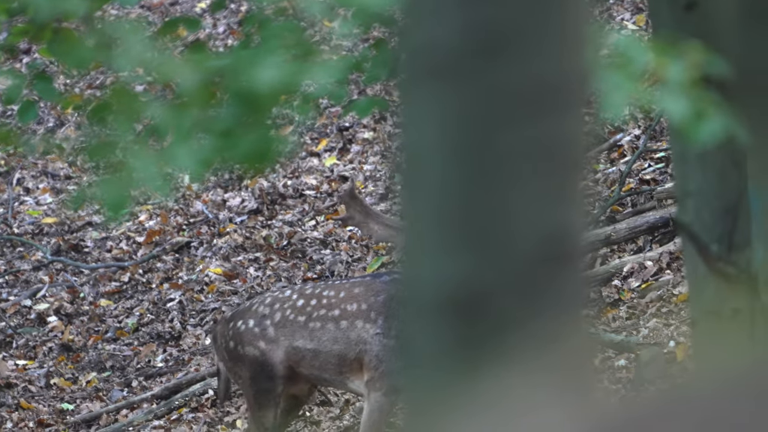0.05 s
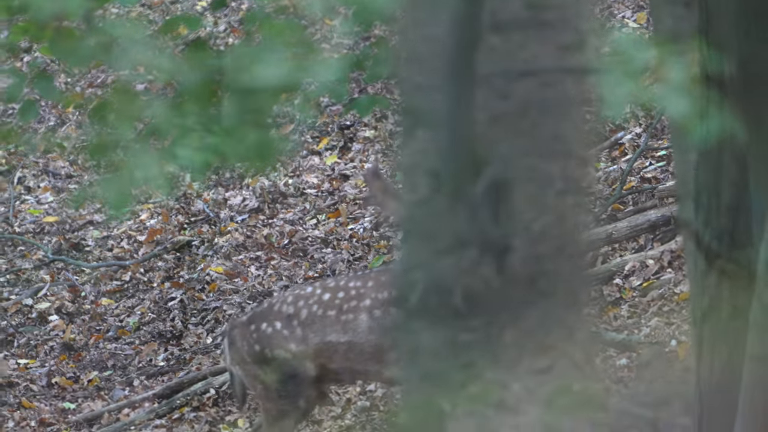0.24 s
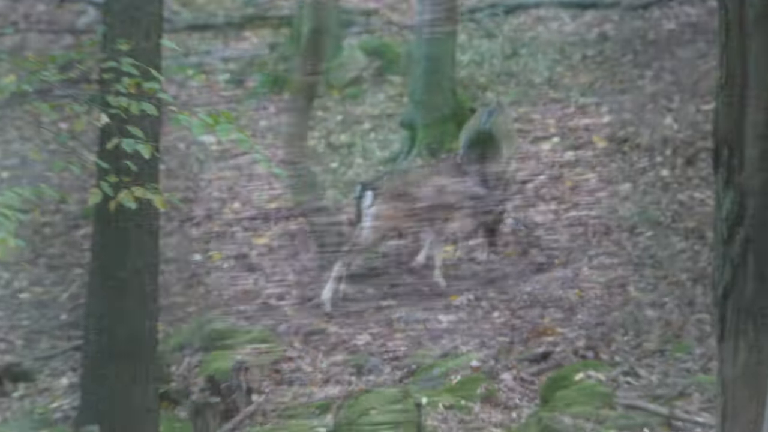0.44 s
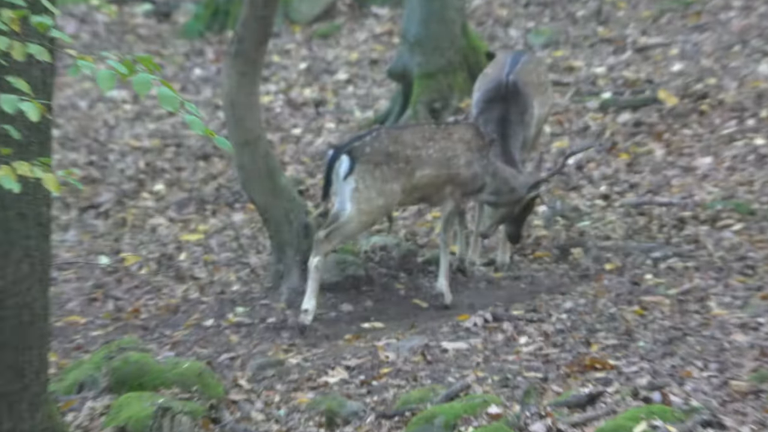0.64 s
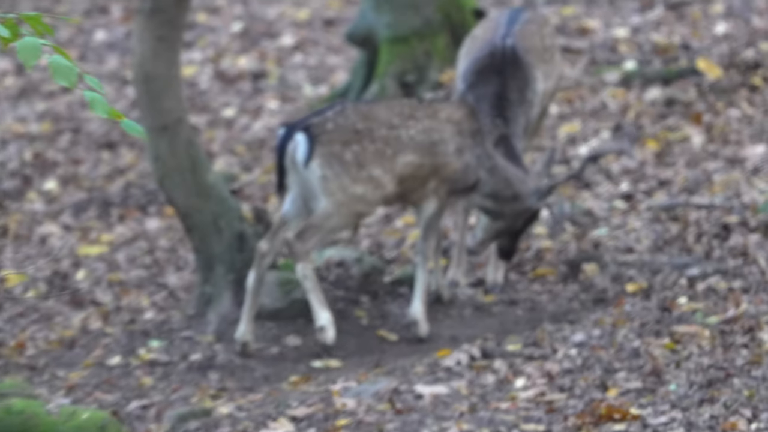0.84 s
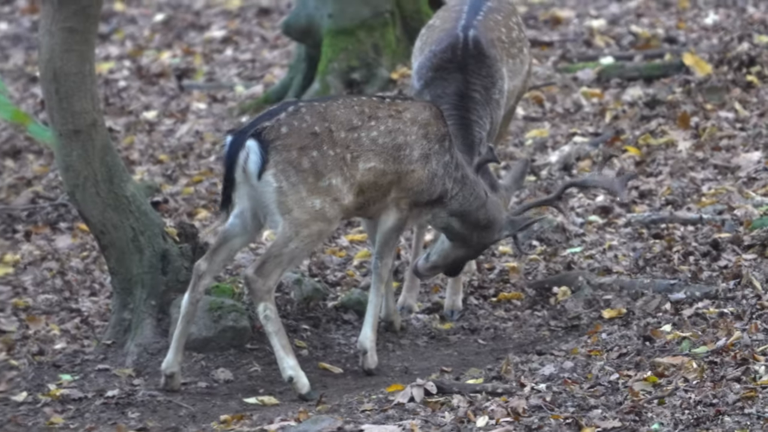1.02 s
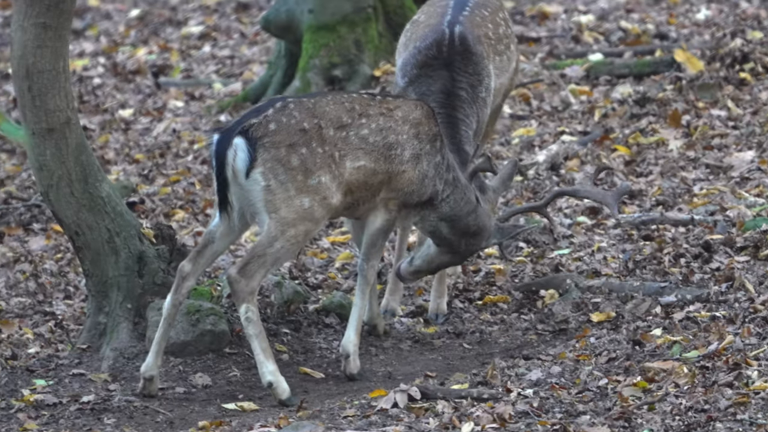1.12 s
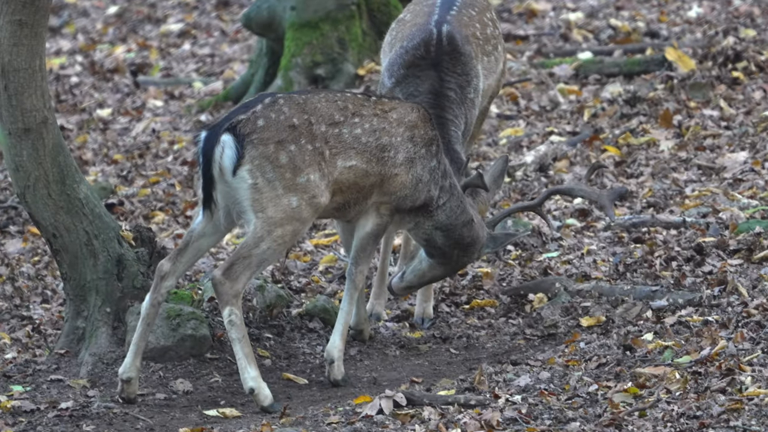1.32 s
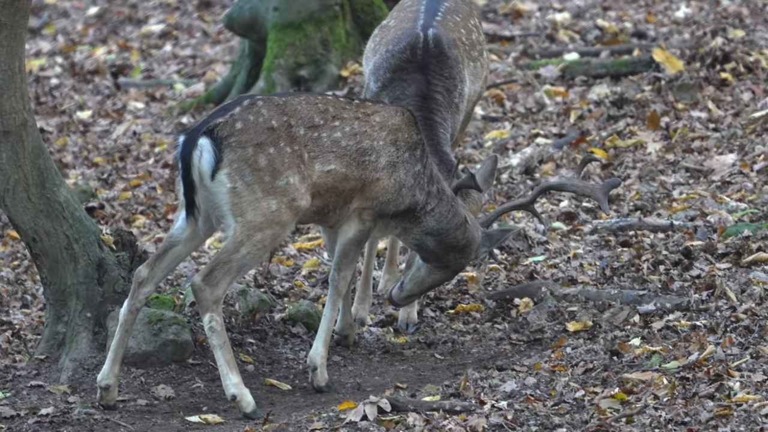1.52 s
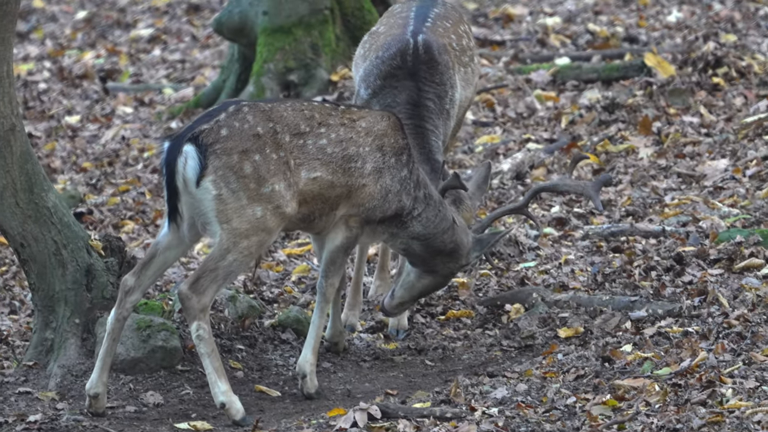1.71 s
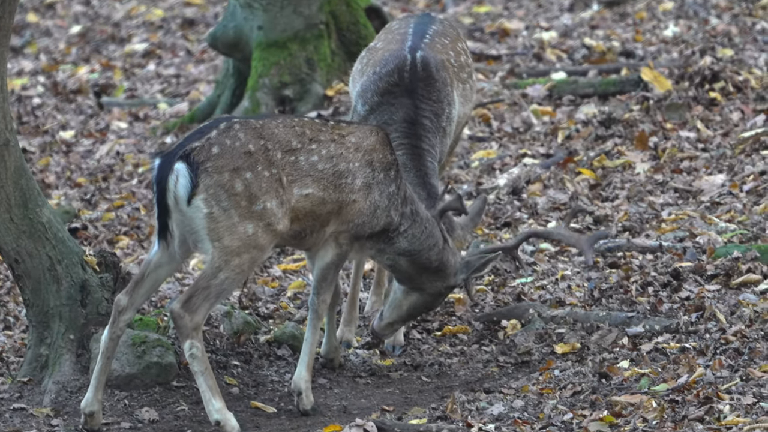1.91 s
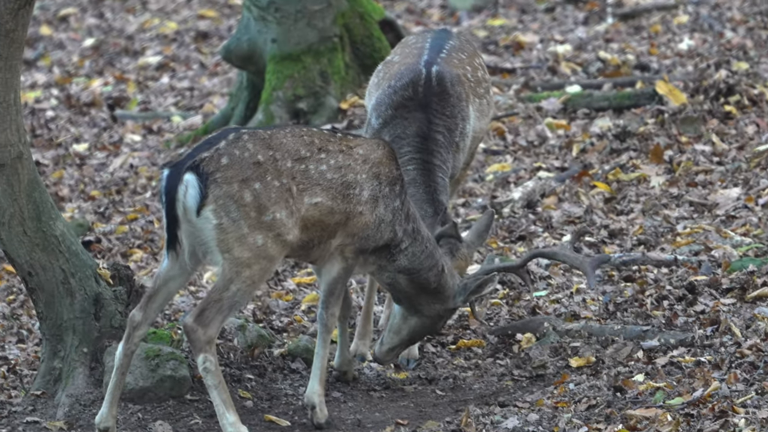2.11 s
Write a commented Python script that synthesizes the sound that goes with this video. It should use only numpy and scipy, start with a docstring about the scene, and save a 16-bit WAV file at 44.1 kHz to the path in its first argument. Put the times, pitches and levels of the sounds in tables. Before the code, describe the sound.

A deer groans three times in slow rattling pulses that echo through a quiet wood. Antlers clack twice and nearby dry leaves rustle during the first two groans. A close wooden knock comes before the last, loudest groan.

```python
"""Fallow buck in a beech wood

Out among the trees a buck groans three times: slow, rattling pulses of the larynx ring in his long
throat and echo among the trunks, where antlers clack twice. Nearer the microphone dry leaves rustle
up and die away, a foot falls softly and something wooden knocks close by. Thin bird notes carry
from far off at the start. One microphone, with a little hiss of its own."""
import sys
import numpy as np
from scipy import signal
from scipy.fft import rfft, irfft
from scipy.io import wavfile

SR = 44100
rng = np.random.default_rng(int(sys.argv[2]) if len(sys.argv) > 2 else 0)


def bounce(signal):
    """Save signal as a 16-bit WAV file at the path given by the first command-line argument."""
    frames = np.transpose(np.atleast_2d(signal))
    limited = np.clip(frames, -1, 1)
    pcm = np.round(limited * 32767).astype(np.int16)
    wavfile.write(sys.argv[1], SR, pcm)


N = 94815
TIME = np.arange(N) / SR

# Levels within a table are relative; t60 is the time to die away by 60 dB.
# the quiet wood and the microphone's hiss: f/Hz, level/dB
AIR_SPECTRUM = [(25, -9), (70, -9.5), (130, -10.5), (200, -1), (300, -8.5), (440, 1), (640, 5), (820, -14),
                (1100, -6.5), (1600, -12), (2500, -13), (4500, -18.5), (7000, -21), (10000, -22.5),
                (15500, -23)]
# far birds: t/s, length/s, f/Hz, level/dB
FAR_NOTES = [(0, 0.17, 6540, -66), (.036, 0.017, 4140, -51)]
# the leaves' dull body and bright hiss: f/Hz, level/dB
RUSTLE_SPECTRUM = [(30, -26), (90, -12), (190, -4.5), (300, -18.5), (410, 4.5), (560, 3.5), (800, -12),
                   (1100, -4), (1500, -15), (2200, -9.5), (4000, -34), (15000, -72)]
HISS_SPECTRUM = [(400, -18), (1500, -1.5), (2200, 0), (2800, 3), (4200, -5.5), (4750, -6), (6500, -12),
                 (10000, -23), (15000, -32)]
# the swell of that body, that hiss and a low hollow ring alongside: t/s, level/dB
RUSTLE_SWELL = [(.15, -54), (.33, -33.5), (.45, -34), (.55, -33), (.69, -37), (.79, -37), (.9, -38.5),
                (1.05, -43), (1.2, -46), (1.35, -89)]
HISS_SWELL = [(.33, -79), (.42, -48), (.53, -41.5), (.69, -37.5), (.79, -40), (.9, -45.5), (1.05, -56),
              (1.15, -97)]
HOLLOW_SWELL = [(.3, -93), (.7, -45.5), (.85, -46), (1.0, -47.5), (1.2, -80)]
# the flapping of the larynx, one list a groan: t/s, rate/Hz
LARYNX_RATES = [
    [(.2088, 30.4), (.28, 34.5), (.33, 14.1), (.40, 25.9), (.47, 27.7), (.53, 37.7), (.61, 29.3)],
    [(.6667, 27), (.72, 43.8), (.77, 33.8), (.86, 45.3), (.93, 24.5), (.99, 24.2)],
    [(1.2268, 18.9), (1.31, 24.8), (1.39, 30.8), (1.445, 33.1), (1.46, 20.7), (1.5, 22), (1.545, 23.4),
     (1.6, 21)],
]
# the effort behind each groan: t/s, level/dB
GROAN_EFFORTS = [
    [(.21, -3.5), (.24, -15), (.27, -3), (.31, 0.5), (.36, 3), (.41, 5.5), (.46, -5), (.53, -1), (.6, -11)],
    [(.667, -9.5), (.725, -0.5), (.78, -1), (.87, -8.5), (.94, -1.5), (.98, -20)],
    [(1.227, -14.5), (1.275, -9), (1.317, -6.5), (1.355, -4), (1.39, -1.5), (1.423, -6.5), (1.452, 2.5),
     (1.5, 2.5), (1.542, -3.5), (1.6, -16)],
]
# the voice of each groan: level/dB, throat lengthening/share, treble tilt at start and at end/(dB per
# decade), chest level/dB, rasp decay/s
GROAN_VOICES = [(-1, 0.082, 0.67, 4, 5, .011), (-1, 0.024, 16, 17, -7, 0.0028),
                (8.5, 0.18, 4.2, 0, 2.5, 0.0037)]
# the buck's throat resonances and chest thump: f/Hz, level/dB, t60/s
THROAT_MODES = [(423, -15.5, 0.11), (657, 0, 0.069), (1064.4, -0.5, 0.063), (1287, -8.5, 0.066),
                (1840, -4, 0.028), (2224, -7, 0.016), (2800, -7, 0.016), (3006, -12.5, 0.035),
                (3423, -5, 0.011), (4220, -24.5, 0.0084), (4620, -13, 0.013)]
CHEST_MODES = [(75.5, -25, 0.13), (150, -12, 0.03)]
# the colour of the wood's echo: f/Hz, level/dB
ECHO_SPECTRUM = [(100, -2), (200, -4), (300, 4), (430, 15.5), (620, 1), (820, -4), (1050, -0.5),
                 (1500, -6.5), (2000, -3.5), (3500, -10.5), (8000, -10)]
# how long it hangs among the trees: f/Hz, t60/s
ECHO_DECAY = [(100, 0.41), (450, 1.45), (1100, 1.56), (2500, 1.6), (8000, 1.7)]
# contacts of foot, antlers and knock: t/s, level/dB
FOOT_CONTACTS = [(.322, -39)]
ANTLER_CONTACTS = [(.359, -49), (.7772, -33.5)]
WOOD_CONTACTS = [(1.1043, -18), (1.1068, -25.5), (1.1105, -34.5)]
# the bodies they set ringing: f/Hz, level/dB, t60/s
GROUND_MODES = [(60, -2, .12), (117, 0.2, 0.072)]
ANTLER_MODES = [(1100, -29, 0.023), (1720, 3.5, 0.013), (2005, 4, 0.049), (2305, 3.5, 0.14),
                (2910, 4, 0.024), (4430, -33, .015)]
WOOD_MODES = [(191, -5.5, 0.087), (407, 0, 0.012), (613, 9.5, 0.0091), (833, 12, 0.004), (1455, -12, 0.035),
              (1685, -12, 0.014), (2840, -14.5, 0.017), (4070, -11, 0.004), (6660, -21, 0.0066),
              (8200, -23, 0.0059)]


def from_db(db):
    """Decibels to gain."""
    return 10 ** (np.asarray(db) / 20)


def rms_one(x):
    """Scale to rms 1."""
    return x / np.sqrt(np.mean(x ** 2) + 1e-20)


def at_hz(points, hz):
    """Read a table on a log-frequency axis."""
    f, v = np.transpose(points)
    return np.interp(np.log(np.maximum(hz, 1)), np.log(f), v)


def swell(points):
    """Gain over time from rows of t/s, level/dB."""
    return from_db(np.interp(TIME, *np.transpose(points)))


def coloured(x, spectrum):
    """Give a noise its spectrum, at rms 1."""
    hz = np.arange(N // 2 + 1) * SR / N
    return rms_one(irfft(rfft(x) * from_db(at_hz(spectrum, hz)), N))


def cut(x, hz, kind, order=2):
    """Butterworth low- or high-pass."""
    return signal.sosfilt(signal.butter(order, hz, kind, fs=SR, output="sos"), x)


def add(out, s, x):
    """Mix a short sound in at s seconds."""
    i = int(np.clip(s * SR, 0, N - 1))
    out[i:i + len(x)] += x[:N - i]


def struck(modes, pitch=1, tilt=0, scatter_db=0, size=8000):
    """Modes ring after one impulse; neighbours swing in opposite senses."""
    hz, db, t60 = np.transpose(modes)
    t = TIME[:size, None]
    db = db + tilt * np.log10(hz / 1000) + scatter_db * rng.standard_normal(hz.shape)
    rings = from_db(db - 60 * t / t60) * np.sin(2 * np.pi * hz * pitch * t)
    return rings @ (-1.) ** np.arange(len(hz))


def burst(share, decay_s, size=3000):
    """An impulse followed by a dying puff of noise."""
    puff = rng.standard_normal(size) * np.exp(-TIME[:size] / decay_s)
    puff *= share / np.linalg.norm(puff)
    puff[0] += 1
    return puff


def blows(contacts, modes, grit, grit_s):
    """Gritty contacts on one ringing body."""
    out = np.zeros(N)
    for s, db in contacts:
        add(out, s, from_db(db) * signal.fftconvolve(struck(modes), burst(grit, grit_s)))
    return out


def air(db=-47):
    """The steady bed: quiet wood and microphone hiss."""
    return from_db(db) * coloured(rng.standard_normal(N), AIR_SPECTRUM)


def birds(width_hz=770):
    """Thin notes, blurred by distance into narrow bands of noise."""
    out = np.zeros(N)
    for s, length, hz, db in FAR_NOTES:
        peak = signal.iirpeak(hz, hz / width_hz, fs=SR)
        note = rms_one(signal.lfilter(*peak, signal.lfilter(*peak, rng.standard_normal(N))))
        size = int(length * SR)
        add(out, s, from_db(db) * note[:size] * np.hanning(size))
    return out


def leaves(crackles_per_s=1000, crackle_share=.5, hollow_hz=196.8, width_hz=35):
    """Near the microphone: dry leaves rustle dully, hiss and crackle, while a low hollow ring swells and fades
    alongside."""
    crackles = (rng.random(N) < crackles_per_s / SR) * rng.standard_normal(N)
    hiss = coloured(rng.standard_normal(N) + crackle_share * rms_one(crackles), HISS_SPECTRUM)
    rustle = coloured(rng.standard_normal(N), RUSTLE_SPECTRUM)
    peak = signal.iirpeak(hollow_hz, hollow_hz / width_hz, fs=SR)
    hollow = rms_one(signal.lfilter(*peak, rng.standard_normal(N)))
    return swell(RUSTLE_SWELL) * rustle + swell(HISS_SWELL) * hiss + swell(HOLLOW_SWELL) * hollow


def larynx_flap(rasp_s, rasp_to_slap=1.9, rise_s=0.00016, size=3000):
    """One opening of the larynx: a slap and a rasping puff of air that swells and dies."""
    t = TIME[:size]
    spectrum = rfft(rng.standard_normal(size) * np.exp(-t / rasp_s))
    puff = irfft(spectrum / (np.abs(spectrum) + 1e-9) ** .5, size)   # evens out the colour
    puff *= (1 - np.exp(-t / rise_s)) * (1 - t / t[-1])
    puff *= rasp_to_slap / np.linalg.norm(puff)
    puff[0] += 1   # the slap
    return puff / np.linalg.norm(puff)


def groan(rates, efforts, voice, trim_db=-29.5, shimmer_db=0.15, scatter_db=1.5):
    """Slow pulses ring throat and chest; the throat lengthens as the larynx is pulled down."""
    s, rate = np.transpose(rates)
    db, lengthening, tilt_from, tilt_to, chest_db, rasp_s = voice
    t = np.arange(s[0], s[-1], 1 / SR)
    cycles = np.cumsum(np.interp(t, s, rate)) / SR
    pulse_times = np.interp(np.arange(int(cycles[-1]) + 1), cycles, t)
    sink = 1 / (1 + (np.array(THROAT_MODES)[:, 0] / 2040) ** 4)   # resonances below 2040 Hz sink most
    out = np.zeros(N)
    for at in pulse_times:
        progress = (at - s[0]) / (s[-1] - s[0])
        effort_db = np.interp(at, *np.transpose(efforts))
        pitch = 1 - lengthening * sink * (progress - .5)
        tilt = tilt_from + progress * (tilt_to - tilt_from)
        throat = struck(THROAT_MODES, pitch, tilt, scatter_db)
        # harder pulses carry more chest, and the hardest reach higher
        chest = from_db(chest_db + 0.13 * effort_db) * struck(CHEST_MODES, scatter_db=scatter_db)
        top_hz = 4130 + 135 * max(effort_db, 0)
        gain = from_db(trim_db + db + effort_db - shimmer_db * rng.standard_normal())
        pulse = signal.fftconvolve(throat + chest, larynx_flap(rasp_s))
        add(out, at, gain * cut(pulse, top_hz, "low", order=8))
    return cut(out, hz=47, kind="high")


def forest(x, build_s=0.026, trunks_db=-4.5, trunks_s=0.035, dip_hz=324):
    """On the way to the microphone near trunks scatter, far ones echo and soft ground cuts a low band."""
    hz = np.arange(N // 2 + 1) * SR / N
    white, echo = rfft(rng.standard_normal(N)), np.zeros(N)
    edges_hz = np.geomspace(40, 16000, 19)
    for low, high in zip(edges_hz, edges_hz[1:]):
        centre = np.sqrt(low * high)
        band = irfft(white * (hz >= low) * (hz < high), N)
        shape = from_db(-60 * TIME / at_hz(ECHO_DECAY, centre)) * (1 - np.exp(-TIME / build_s))
        echo += from_db(at_hz(ECHO_SPECTRUM, centre)) * band * shape / np.linalg.norm(shape)
    add(echo, 0, burst(from_db(trunks_db), trunks_s))   # direct sound and near trunks
    ground_dip = signal.iirnotch(dip_hz, Q=6.6, fs=SR)
    return signal.lfilter(*ground_dip, signal.fftconvolve(x, echo)[:N])


def footfall():
    """A soft step thuds in the ground."""
    return blows(FOOT_CONTACTS, GROUND_MODES, grit=0.22, grit_s=0.011)


def antlers():
    """Antlers meet twice and ring briefly, harder the second time."""
    return blows(ANTLER_CONTACTS, ANTLER_MODES, grit=0.28, grit_s=0.003)


def knock():
    """Close by, three quick contacts on wood merge into one knock."""
    return cut(blows(WOOD_CONTACTS, WOOD_MODES, grit=0.67, grit_s=0.0035), hz=130, kind="high")


def scene():
    """Buck and antlers out among the trees; knock, step and leaves nearer, without echo."""
    buck = sum(groan(*parts) for parts in zip(LARYNX_RATES, GROAN_EFFORTS, GROAN_VOICES))
    clacks = antlers()
    direct = 0.48 * clacks + knock() + footfall()
    bed = air()
    among_trees = forest(buck + 0.78 * clacks)
    return (among_trees + direct + leaves() + birds() + bed)[None]


def record(dry, cutoff_hz=15700):
    """The microphone's signal, with the top cut steeply."""
    return signal.sosfilt(signal.ellip(12, .1, 80, cutoff_hz, fs=SR, output="sos"), dry)


dry = scene()
out = record(dry)
bounce(out)
```